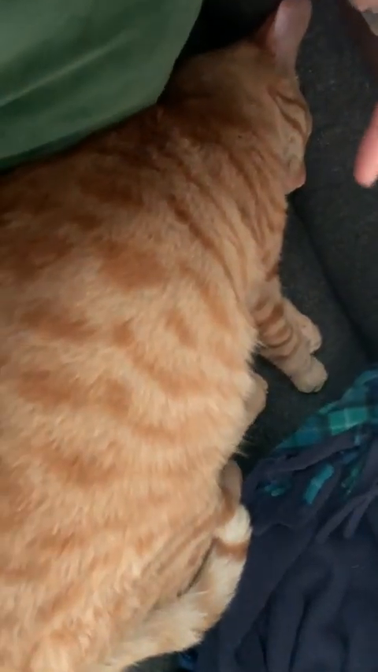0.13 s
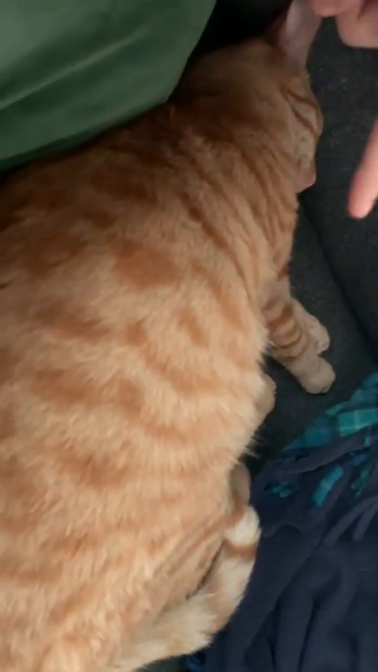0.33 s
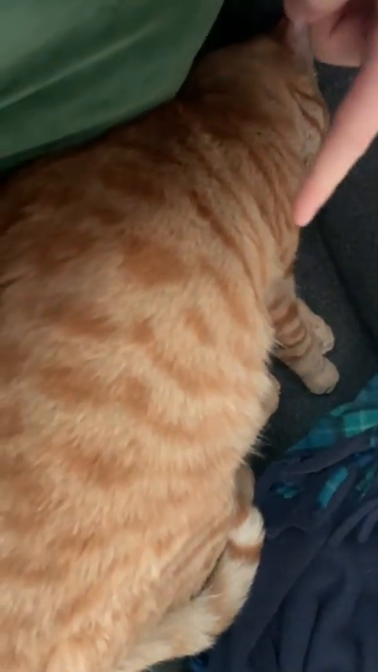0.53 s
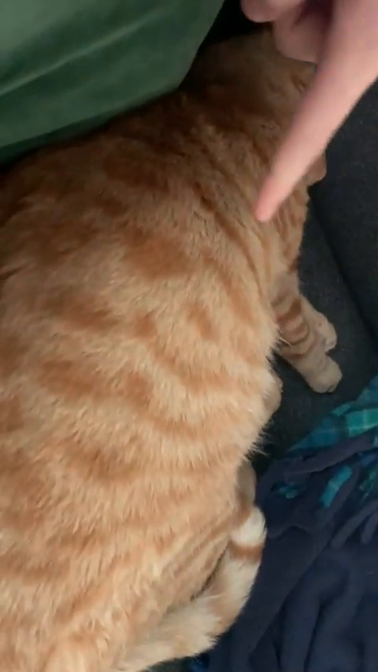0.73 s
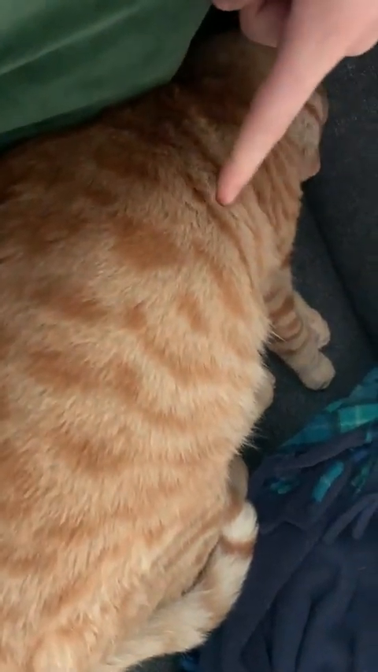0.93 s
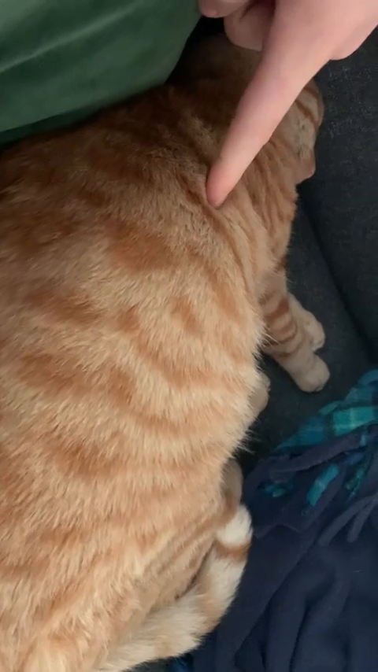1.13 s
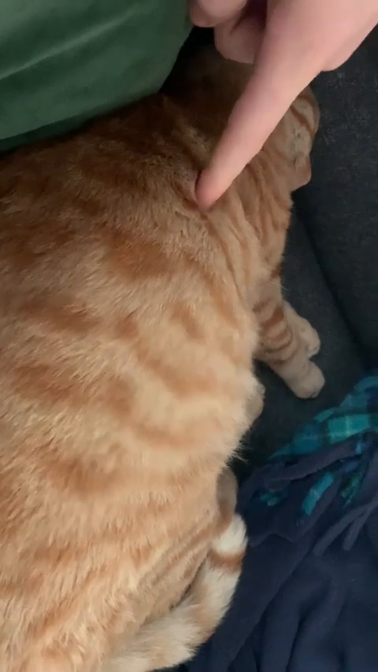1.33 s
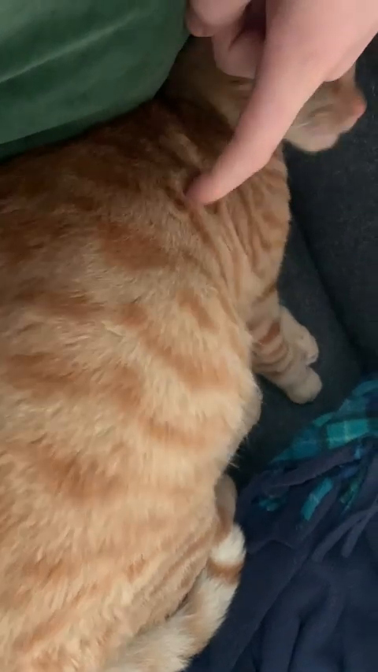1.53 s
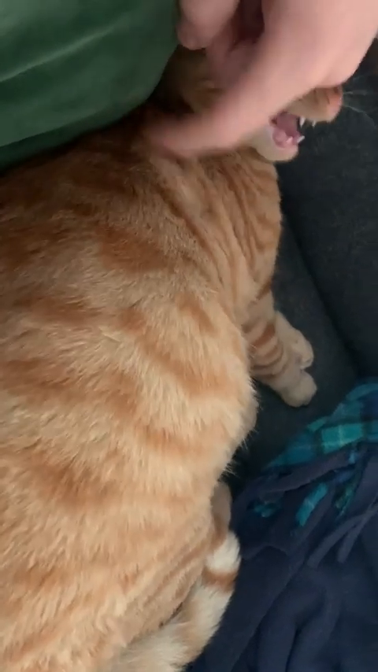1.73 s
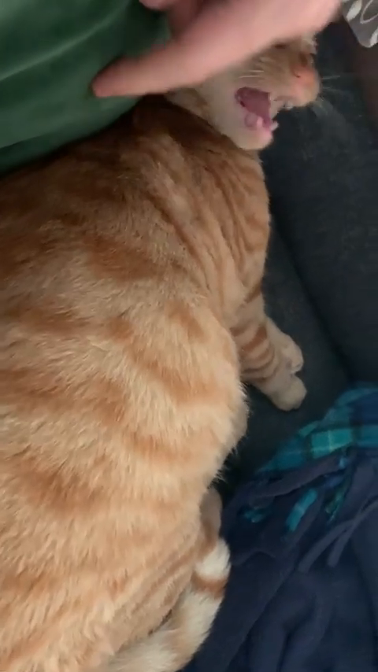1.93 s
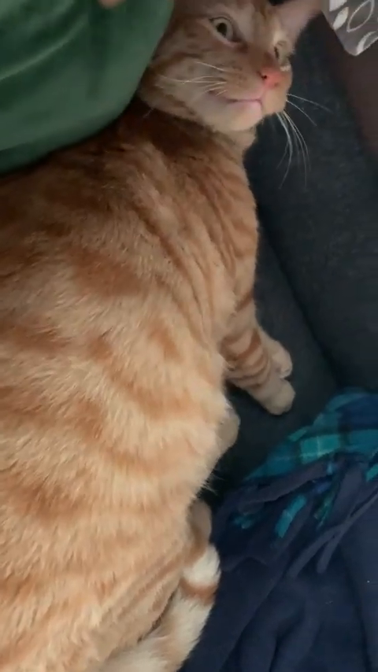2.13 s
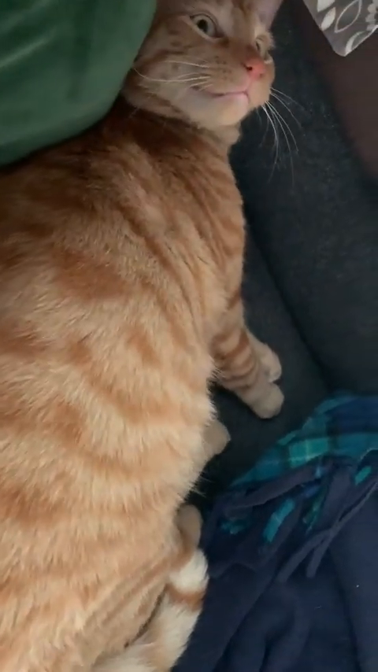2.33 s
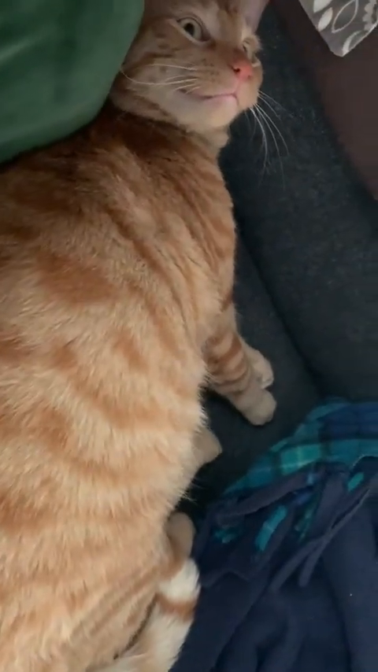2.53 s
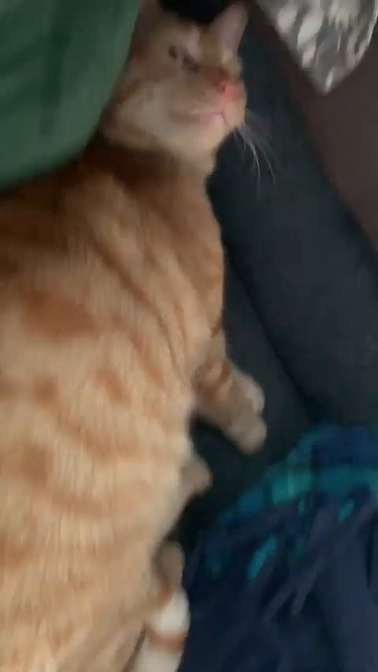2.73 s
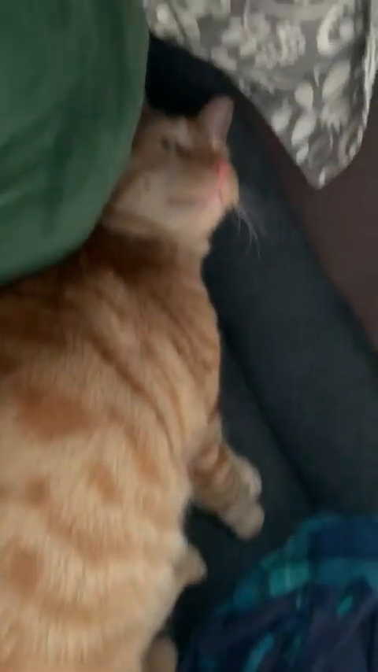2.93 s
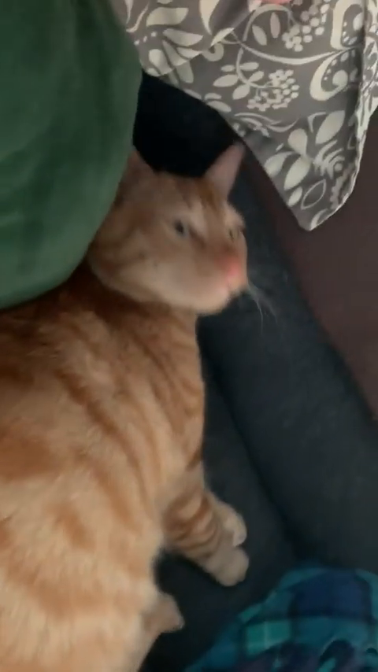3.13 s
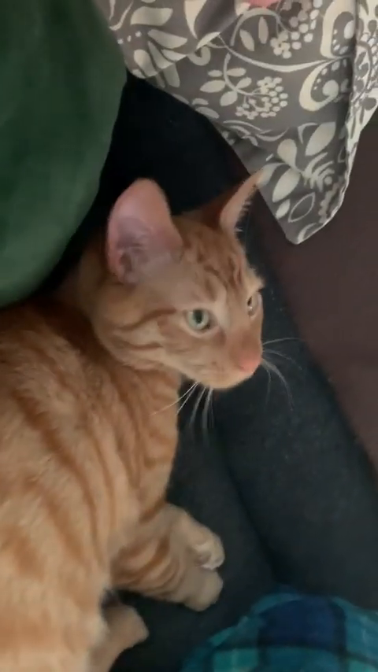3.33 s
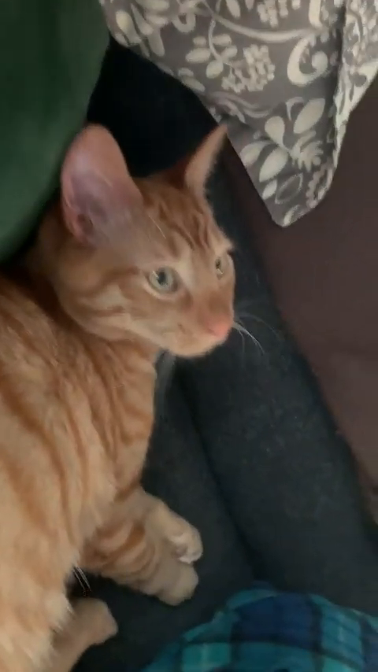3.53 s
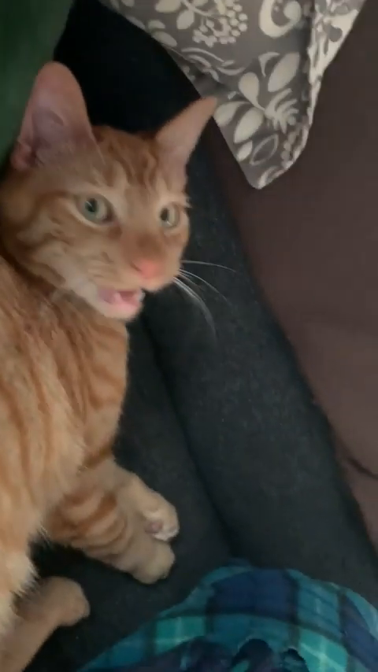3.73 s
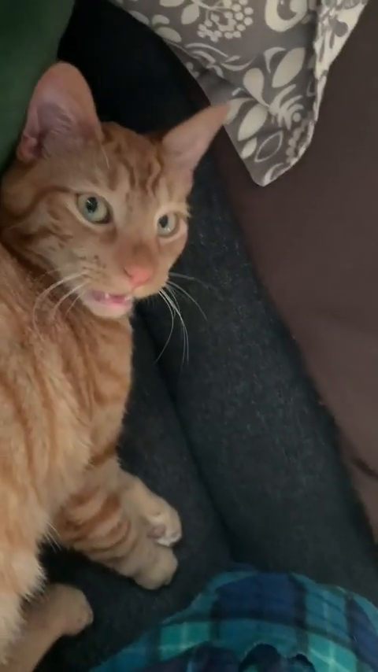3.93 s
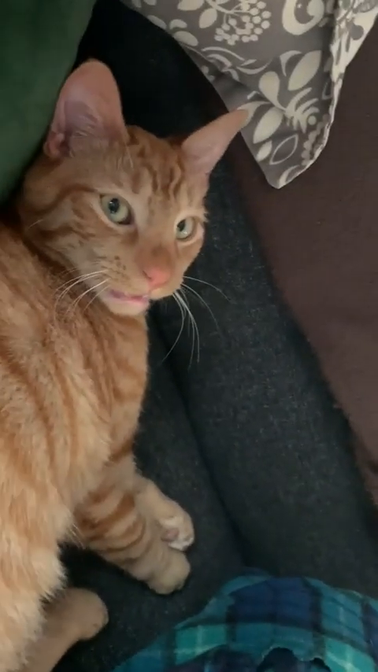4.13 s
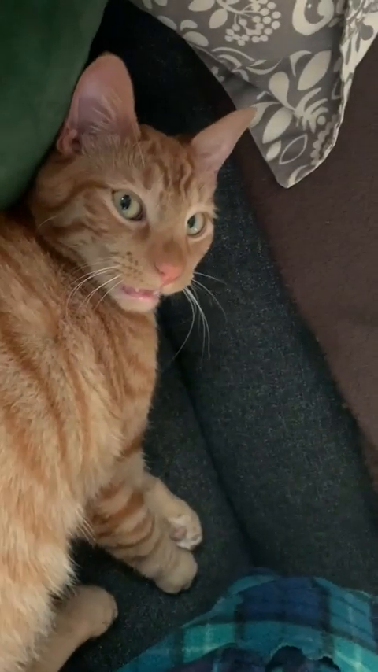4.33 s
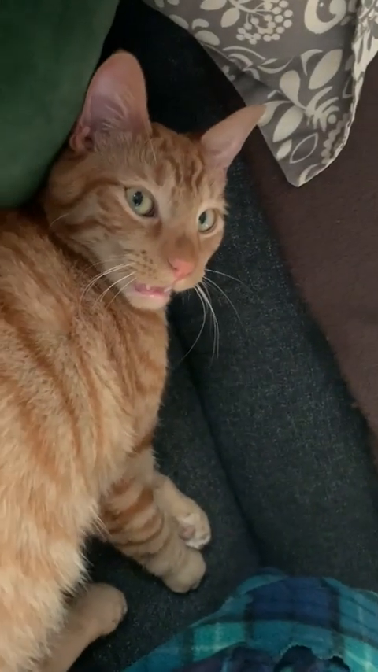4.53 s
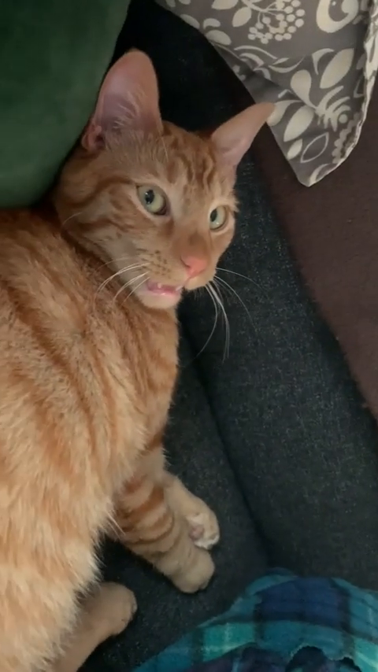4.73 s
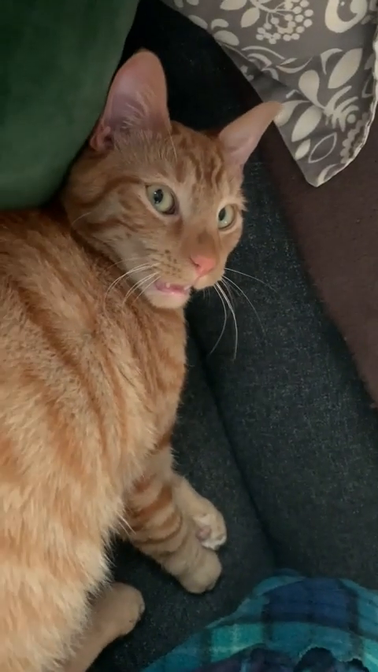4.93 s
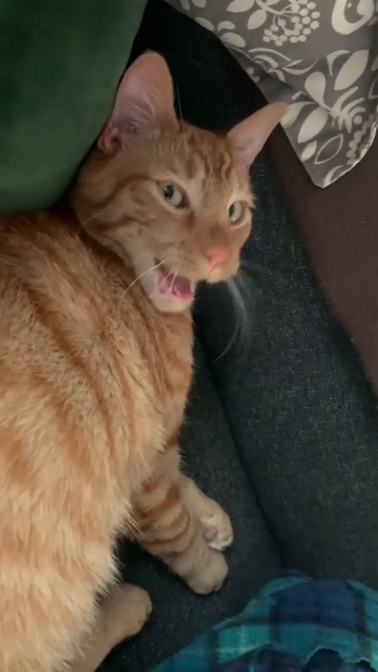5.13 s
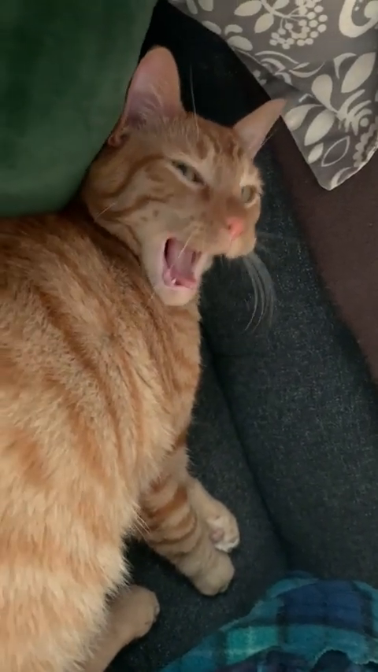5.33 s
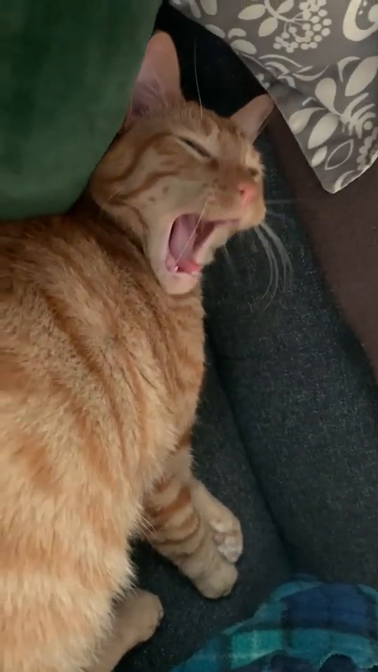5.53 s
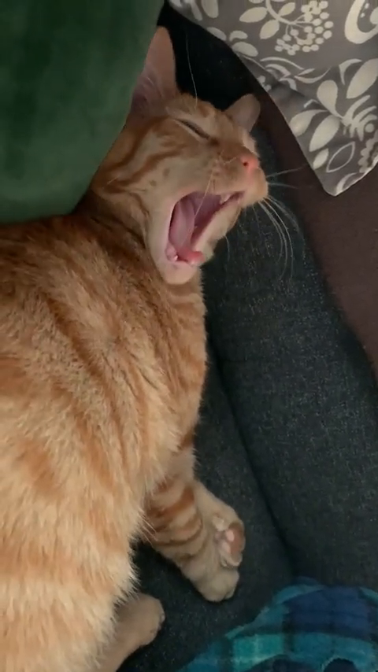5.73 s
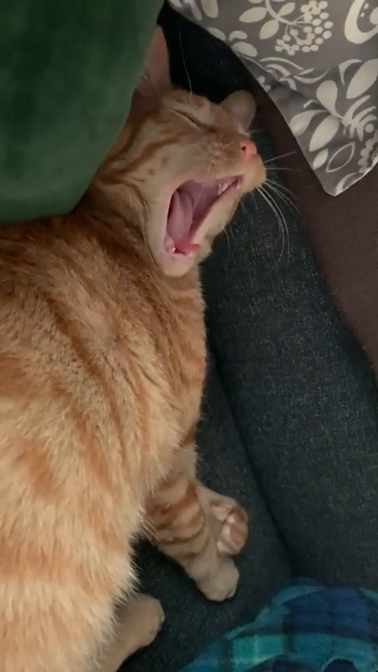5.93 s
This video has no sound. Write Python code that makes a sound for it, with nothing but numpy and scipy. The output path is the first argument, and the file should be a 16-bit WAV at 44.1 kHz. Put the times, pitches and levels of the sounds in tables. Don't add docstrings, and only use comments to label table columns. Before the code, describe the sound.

Quiet low room rumble with a distant fan drone and thin whine. After a second of faint rubbing, a cat very near the microphone purrs out a rolling trill, rasps and squeaks, voice cracking. Cushions are pushed with muffled thumps, cloth rustles. Then a barely audible broken chirp, wet mouth clicks, a bright smooth mew, a pause, and a high whistly yawn squeak.

```python
import sys
import numpy as np
from scipy import signal
from scipy.fft import rfft, irfft, next_fast_len
from scipy.io import wavfile
from scipy.ndimage import uniform_filter1d, map_coordinates

SR = 44100
rng = np.random.default_rng(int(sys.argv[2]) if len(sys.argv) > 2 else 0)


def ratio_of_db(decibels):
    return 10 ** (np.asarray(decibels, float) / 20)


def digitize_waveform(pressure):
    field = np.atleast_2d(pressure).T
    bounded = np.clip(field, -1, 1)
    quanta = np.round(bounded * 32767).astype(np.int16)
    wavfile.write(sys.argv[1], SR, quanta)


N = 268657

# time [s], peak [dB], ring [Hz], low part [dB], low ring [Hz].
CLICK_EVENTS = [(0.1, -58, 6700, -18, 3080), (1.3603, -57, 6860, -20, 2510), (2.401, -53.5, 6950, -8, 2750),
                (2.708, -64, 6900, -10, 3070), (3.038, -56, 7200, -18, 2680), (3.5686, -63, 7000, -1, 3900),
                (3.573, -33.5, 7580, -28, 3830), (3.635, -41.5, 8150, -16, 3430),
                (4.0958, -62, 7500, -3, 3530), (4.4933, -45, 7900, -23, 3180),
                (4.5344, -71, 7290, -1, 3500), (5.0897, -47, 10150, -2.5, 3090)]
# frequency [Hz], level [dB].
NEAR_SIDE = [(200, -12), (560, -3.5), (1100, -13), (1800, -6), (2500, -1.5), (3700, -0.5), (6500, -3),
             (9000, -6), (14000, -7)]


def unit(x):
    return x / np.sqrt(np.mean(x ** 2) + 1e-20)


def along(points, hz):
    f, v = np.transpose(points)
    return np.interp(np.log(hz + 1), np.log(f + 1), v)


def curves(rows):
    s, *cols = np.transpose(rows)
    return [np.interp(np.arange(N) / SR, s, c) for c in cols]


def gate(rows, fade_s):
    t = np.arange(N) / SR
    return np.clip(np.minimum(t - rows[0][0], rows[-1][0] - t) / fade_s, 0, 1)


def wobble(rate):
    knots = rng.standard_normal(int(N * rate / SR) + 4)
    return map_coordinates(knots, [np.arange(N) * rate / SR])


def filtered(x, response):
    m = next_fast_len(N + SR // 2)
    return irfft(rfft(x, m) * response(np.fft.rfftfreq(m, 1 / SR)), m)[..., :N]


def noise(spectrum):
    return unit(filtered(rng.standard_normal(N), lambda hz: ratio_of_db(along(spectrum, hz))))


def played(rows, *layers):
    t, gains = np.arange(N) / SR, np.zeros((len(layers), N))
    for s, rise, fall, *db in rows:
        live = slice(max(round((s - 2 * rise) * SR), 0), round((s + 2 * fall) * SR))
        off = (t[live] - s) / np.where(t[live] < s, rise, fall)
        gains[:, live] += ratio_of_db(np.array(db)[:, None] - 20 * off ** 2)
    return np.sum(gains * layers, axis=0)


def beside(mid, gain):
    # frequency [Hz], lead [radians].
    side_lead = [(60, 4), (400, 3.5), (700, 3), (1100, 2), (1800, 2), (2500, 1.5), (3700, 2), (6500, -1.45)]
    return filtered(mid, lambda hz: gain(hz) * np.exp(1j * along(side_lead, hz)))


def voice(rows, timbre, mouth, flutter=0, slack_per_db=0, jaw_db=0, glide_s=0):
    flutter_hz, crest_s, flutter_end_s, depth, depth_db = 37.2, 1.5025, 1.622, .084, 2.0
    lean_rad, stumble_rad = .6, .25
    flag_per_db, flare_db, jaw_s = .022, 4, 0.043
    t = np.arange(N) / SR
    pitch, first, opening = curves(rows)
    pitch = uniform_filter1d(pitch, size=round(glide_s * SR) + 1)
    second_db, third_db, upper_db, rough, patchy_db = timbre
    second = first + second_db + opening + 0.41 * patchy_db * wobble(45)
    third = first + third_db + opening
    sag_db = first.max() - first
    rough = rough + slack_per_db * sag_db
    upper_db = upper_db + jaw_db * np.exp(-np.abs(t - rows[0][0]) / jaw_s)

    beat = 2 * np.pi * flutter_hz * (t - crest_s) + stumble_rad * wobble(24.86)
    flutter = flutter * np.clip((flutter_end_s - t) / 0.01, 0, 1)
    flutter = flutter * np.clip(1.5 - flag_per_db * sag_db, 0, 1)
    swing = flutter * (np.cos(beat) + .25 * np.sin(2 * beat))
    shake = 0.0614 * rough * wobble(120) + 0.00284 * wobble(30) + 0.0042 * wobble(250)
    pitch = pitch * (1 + depth * swing + shake)
    phase = 2 * np.pi * np.cumsum(pitch) / SR

    out = -ratio_of_db(first) * np.cos(phase) - ratio_of_db(second) * np.cos(2 * phase)
    out = out + ratio_of_db(third + patchy_db * wobble(60)) * np.sin(3 * phase - 1.5)
    live = slice(round(rows[0][0] * SR), round(rows[-1][0] * SR))
    for k in range(4, 12):
        level = third + upper_db + along(mouth, k * pitch)
        level = level + flare_db * flutter * np.cos(beat) * (k > 5)
        level = level + patchy_db * (wobble(150) + wobble(25))
        out[live] += ratio_of_db(level[live]) * np.sin(k * phase[live])
    loud_db = depth_db * flutter * np.cos(beat + lean_rad) + 9 * rough * wobble(150) + 0.38 * wobble(40)
    return np.sqrt(2) * gate(rows, fade_s=0.0029) * ratio_of_db(loud_db) * out


def calls():
    # time [s], pitch [Hz], level [dB], mouth opening [dB].
    trill = [(1.312, 773, -61, -6), (1.358, 668, -57, -7.5), (1.408, 621.5, -50.5, -5.5),
             (1.47, 559.4, -45.5, -2.5), (1.522, 560, -43.5, -0.5), (1.55, 558.4, -44, 0.5),
             (1.575, 563.5, -43.5, 0), (1.598, 576, -47, 5), (1.61, 596, -47, 4.5), (1.62, 710, -68, 9)]
    afterbeat = [(1.611, 636, -59, 4), (1.62, 629, -58.5, 5), (1.632, 622, -53, 5.1),
                 (1.642, 670, -57, 5.5), (1.65, 700, -62, 5), (1.66, 660, -74, 3)]
    squeak_parts = [
        [(1.715, 976, -67, -4), (1.727, 987, -48.5, -8), (1.736, 1000, -50, -4), (1.755, 1002, -50, -2),
         (1.776, 974, -54, -5)],
        [(1.801, 950, -50, 5), (1.811, 1016, -54, 1.5), (1.817, 992, -54, 5), (1.824, 960, -53, 0),
         (1.833, 1034, -52, 1), (1.847, 1046, -48, 5), (1.862, 935, -56, 8)],
    ]
    voice_break = [(1.7765, 892, -51, -1), (1.788, 908, -50, 0), (1.801, 934, -50, 0)]
    cry = [(1.858, 919, -50, 8), (1.87, 951, -53.5, 13), (1.892, 1013, -47.5, -3), (1.915, 980, -47, -1),
           (1.934, 953, -49, 2), (1.968, 968, -49.5, -3), (1.981, 1010, -41.5, -15),
           (1.991, 1050, -43.5, -20), (2.008, 1025, -64, -8)]
    chirp = [(3.089, 900, -66, -8), (3.099, 956, -53.5, -13), (3.109, 934, -50, -7), (3.114, 870, -53, 6),
             (3.122, 904, -75, 0), (3.134, 953, -51, -5), (3.139, 900, -62, 6), (3.143, 1050, -65, -5),
             (3.15, 930, -66, -5), (3.165, 913, -60, -6), (3.18, 920, -68, -6)]
    mew = [(3.6395, 1049, -43, -1), (3.652, 1035, -40.5, 6.5), (3.658, 1040, -41, 3),
           (3.662, 1076, -47, -10), (3.671, 1084, -46, -10), (3.677, 1082, -42.5, -3),
           (3.688, 1097, -41, 2), (3.708, 1160, -39.5, 2), (3.75, 1189, -40, -1), (3.798, 1207, -41.5, -1),
           (3.81, 1235, -41.5, -8), (3.832, 1270, -44, -2), (3.862, 1268, -42.5, -1),
           (3.89, 1235, -40.5, -4), (3.955, 1147, -41, -12), (3.974, 1127, -44, -17),
           (3.985, 1048, -45, -18), (3.994, 1020, -44.5, -18), (4.006, 1016, -57, -14)]
    yawn = [(5.06, 1023, -77, 1), (5.09, 1110, -54, -5), (5.098, 1098, -42, -10), (5.122, 1184, -42.5, 2),
            (5.15, 1200, -44.5, -11), (5.195, 1201, -47.5, -14), (5.25, 1283, -49, -5),
            (5.346, 1439, -56.5, 6), (5.405, 1478, -64.5, 11.5), (5.45, 1464, -58.5, 9),
            (5.524, 1385, -49.5, 2), (5.624, 1208, -44, -16), (5.704, 1149, -48.5, -8),
            (5.735, 1140, -61, -5)]
    # frequency [Hz], level [dB].
    open_mouth = [(3500, 14.5), (4300, 18.5), (4900, -11), (5900, 12.5), (7300, 14.5), (7700, 5), (8300, 4),
                  (8800, -10), (9500, 4), (10000, -16), (10700, -10), (11500, -34)]
    shut_lips = [(2300, -4), (2800, -16.5), (3300, -39), (4100, -11), (4600, -24.5), (5300, -42),
                 (7000, -21), (9000, -48)]
    # 2nd over 1st dB, 3rd over 1st dB, higher harmonics dB, roughness 0-1, patchiness dB
    purred, flicked = (7.5, -4, -4, 0.02, 0.8), (5, -2, 6, 0.12, 2)
    hoarse, broken = (-11, -29, -13, .1, 4), (0, -1, -26, .09, 1.5)
    strained, cracked = (-10, -23, -17, .08, 1.8), (-16, -24, -29, 0.47, 4)
    clear, thin = (-22, -33, -13, .075, 4), (-23, -35, -24, .045, 4)
    glide_s = .025

    out = voice(trill, purred, shut_lips, flutter=0.86, slack_per_db=.003)
    out = out + voice(afterbeat, flicked, shut_lips)
    for part in squeak_parts:
        out = out + voice(part, hoarse, open_mouth)
    out = out + voice(voice_break, broken, open_mouth)
    out = out + voice(cry, strained, open_mouth)
    out = out + voice(chirp, cracked, open_mouth)
    out = out + voice(mew, clear, open_mouth, jaw_db=-16, glide_s=glide_s / 2)
    return out + voice(yawn, thin, open_mouth, glide_s=glide_s)


def rasp():
    # peak [s], rise [s], fall [s], rattle [dB], hiss [dB].
    puffs = [(1.36, 0.022, 0.071, -62, -70), (1.5, 0.099, 0.16, -69, -70), (1.62, 0.064, 0.041, -55, -74),
             (1.648, .006, 0.02, -53, -80), (1.695, 0.038, 0.0092, -58.5, -68.5),
             (1.72, .005, 0.06, -63, -67), (1.772, 0.029, 0.01, -59, -58),
             (1.818, 0.015, 0.054, -51, -56.5), (1.865, 0.032, 0.047, -70, -57),
             (1.895, 0.023, 0.042, -57.5, -56.5), (1.98, 0.058, 0.027, -76, -61.5),
             (3.164, .05, .04, -83, -76.5), (3.579, 0.0046, 0.0057, -63, -61.5),
             (3.62, .03, 0.028, -82, -78), (3.648, 0.012, 0.028, -64.5, -67),
             (4.05, 0.098, .02, -80, -77.5)]
    # peak [s], rise [s], fall [s], level [dB].
    creaks = [
        (1.65, .006, 0.072, -49.5),
        (3.12, .04, 0.062, -70),
        (3.555, .006, 0.035, -56.5),
        (3.591, 0.0045, 0.01, -48),
        (3.601, 0.0069, 0.019, -49),
        (3.145, 0.0087, 0.022, -60),
    ]
    # centre [Hz], width [Hz], level [dB].
    throat_modes = [(1060, 190, 8), (1770, 360, 4), (2510, 200, 9.5), (4130, 880, -8)]
    # frequency [Hz], density [dB per Hz].
    hiss_spectrum = [(4500, -45), (5300, -44), (6300, 3.5), (7200, 14.5), (7600, 6), (7950, -7), (8500, 6),
                     (9300, -10), (10500, -30), (12000, -34)]

    def throat(f):
        modes = enumerate(throat_modes)
        return sum((-1) ** k * ratio_of_db(db) * 1j * f * w / (c * c - f * f + 1j * f * w) for k, (c, w, db) in modes)

    def creak_mode(f):
        return (1j * f * 700 / (1050 ** 2 - f * f + 1j * f * 700)) ** 2

    slaps = (rng.random(N) < 420 / SR) * ratio_of_db(3 * rng.standard_normal(N))
    slaps = unit(slaps) + 1.3 * rng.standard_normal(N)
    rattle = ratio_of_db(0.5) * unit(filtered(slaps, lambda f: throat(f) / (1 + (f / 4300) ** 8)))
    hiss = ratio_of_db(-1.0) * unit(ratio_of_db(1.0 * wobble(200)) * noise(hiss_spectrum))
    creak = unit(filtered(slaps, creak_mode))
    return played(puffs, rattle, hiss) + played(creaks, creak)


def fry():
    # time [s], peak [dB].
    lone_slaps = [(1.6563, -40), (1.681, -38), (1.6848, -42), (1.6886, -35), (1.6929, -36), (1.6991, -35),
                  (1.7195, -42), (1.724, -38), (1.7283, -38), (1.7582, -38), (1.7715, -37), (1.7765, -38),
                  (1.8005, -39), (1.8025, -38), (1.8046, -32), (1.8085, -34), (1.8145, -38), (1.818, -37),
                  (1.8267, -35), (1.8328, -37), (1.8355, -37), (1.841, -37)]
    # start [s], end [s], rate [per s], peak [dB].
    slap_runs = [
        (1.662, 1.678, 280, -47.5),
        (1.733, 1.754, 320, -43.5),
        (1.761, 1.77, 300, -42),
        (1.8205, 1.828, 380, -39),
        (1.842, 1.859, 380, -42),
    ]
    slap_hz, width_hz, jitter, scatter_db = 1770, 1070, .14, 2
    blows = np.zeros(N)
    for start, end, rate, db in slap_runs:
        chance = rng.standard_normal((2, 30))
        s = start + (np.arange(30) + jitter * chance[0]) / rate
        inside = s < end
        blows[np.round(s[inside] * SR).astype(int)] = ratio_of_db(db + scatter_db * chance[1][inside])
    for s, db in lone_slaps:
        blows[round(s * SR)] = ratio_of_db(db)
    peak = 2 * np.sqrt(np.pi) * width_hz / SR
    return -filtered(blows, lambda f: np.exp(-((f - slap_hz) / width_hz) ** 2 - .6j) / peak)


def clicks():
    out, t = np.zeros(N + SR), np.arange(SR // 50) / SR
    for s, db, hz, low_db, low_hz in CLICK_EVENTS:
        ring = np.sin(2 * np.pi * hz * t) * ratio_of_db(-60 * t / 0.0028)
        ring = ring + 0.38 * rng.standard_normal(len(t)) * ratio_of_db(-60 * t / 0.0013)
        ring = ring + ratio_of_db(low_db) * np.sin(2 * np.pi * low_hz * t) * ratio_of_db(-60 * t / 0.0074)
        out[round(s * SR):][:len(t)] += ratio_of_db(db + 9.5) * ring * (1 - np.exp(-t / 0.00021))
    return filtered(out[:N], lambda f: 1 / (1 + (f / 14500) ** 6))


def thuds():
    # time [s], peak [dB], frequency [Hz].
    pushes = [
        (2.097, -52, 160),
        (2.265, -53, 166),
        (2.309, -27.5, 183),
        (2.38, -26, 162),
        (2.432, -32, 209),
    ]
    out, t = np.zeros(N + SR), np.arange(SR // 10) / SR
    for s, db, hz in pushes:
        push = np.sin(2 * np.pi * hz * t) * (1 - np.exp(-t / 0.0014))
        out[round(s * SR):][:len(t)] += ratio_of_db(db + 2.5 - 60 * t / 0.018) * push
    return out[:N]


def rustle():
    # peak [s], rise [s], fall [s], bright fur [dB], cloth body [dB].
    strokes = [(.3, 0.94, 0.57, -82.5, -77.5), (.75, 0.7, 0.65, -84.5, -75), (.97, 0.052, 0.05, -89, -83),
               (1.29, 0.066, .05, -81, -91), (1.36, 0.058, 0.28, -79.5, -69), (1.81, 0.079, 0.11, -91, -57),
               (2.1, 0.49, 0.21, -62, -61.5), (2.4, 0.35, 0.091, -72.5, -64),
               (2.708, 0.12, 0.077, -81, -65), (3.06, 0.022, 0.084, -84, -99), (3.17, .08, .05, -84, -72),
               (3.45, 0.24, 0.54, -84, -68.5), (5.52, 0.41, 0.49, -83, -86), (6.05, 0.072, 0.092, -94, -74)]
    # frequency [Hz], density [dB per Hz].
    fur_spectrum = [(3060, -49), (5200, -27), (5620, -14.5), (7230, -4), (7950, -6), (8600, -10.5),
                    (9160, -12.5), (12700, -13), (13800, -15), (15500, -18.5)]
    cloth_spectrum = [(400, -51), (700, 13), (1500, 1.5), (2000, 2.5), (2600, -5.5), (3450, -2),
                      (5100, -4.5), (7000, -11.5), (8000, -23), (10400, -24), (15000, -55)]

    def side_gain(hz):
        band = 1 / (1 + (hz / 7000) ** 24) + np.exp(-((hz - 7550) / 130) ** 2)
        return ratio_of_db(along(NEAR_SIDE, hz) + 3.0) * band

    bright_grain_db = 1.5 * wobble(300) + 1.2 * wobble(18) + 1.0 * wobble(60)
    bright = ratio_of_db(1.0) * unit(ratio_of_db(bright_grain_db) * noise(fur_spectrum))
    body = ratio_of_db(1.5) * unit(ratio_of_db(2.5 * wobble(200) + 1.2 * wobble(20)) * noise(cloth_spectrum))
    mid = played(strokes, bright, body)
    return mid, beside(mid, side_gain)


def walls(x):
    t60_s, tail_db, treble_hz = .15, -19, 3500
    t = np.arange(SR // 3) / SR
    tail = rng.standard_normal((2, len(t))) * ratio_of_db(-60 * t / t60_s)
    tail = tail / np.linalg.norm(tail[0])
    x = filtered(x, lambda hz: 1 / (1 + 1j * hz / treble_hz) ** 2)
    late = np.pad(x, (300, 0))[None]
    return ratio_of_db(tail_db) * signal.fftconvolve(late, tail, axes=1)[:, :N]


def motor():
    # peak [s], rise [s], fall [s], level [dB].
    surges = [
        (0.01, .1, 0.09, -49),
        (.45, 0.25, 0.44, -50.5),
        (1.66, 0.18, 0.16, -44.5),
        (2.12, 0.076, .15, -48),
        (2.37, 0.051, 0.16, -47),
        (4.02, 0.1, 0.14, -41.5),
        (4.44, 0.061, 0.07, -35.5),
        (4.9, 1, 0.16, -53.5),
    ]
    drone_hz, drone_db, whine_hz, whine_db = 215, -50.5, 683, -68
    turn_s, turn_len_s, turn_db = 2.79, 0.13, 3.5
    drone = filtered(rng.standard_normal(N), lambda f: 1 / (1 + ((f - drone_hz) / 12) ** 2))
    drone = ratio_of_db(-7.5) * unit(drone)
    drone = ratio_of_db(drone_db) * drone + played(surges, drone)
    whine_phase = 2 * np.pi * np.cumsum(whine_hz + 1.16 * wobble(6)) / SR
    whine = np.sqrt(2) * ratio_of_db(1.8 * wobble(12)) * np.sin(whine_phase)
    turned = np.clip((np.arange(N) / SR - turn_s) / turn_len_s, 0, 1)
    mid_whine_db = whine_db + turn_db * turned + 0.34 * wobble(3.87) + 2.0
    side = beside(ratio_of_db(-17.5) * drone + ratio_of_db(-57) * whine, lambda f: 1)
    return drone + ratio_of_db(mid_whine_db) * whine, side


def diffuse(mid_gain, side_gain):
    # frequency [Hz], share of side tied to mid.
    tied_share = [(60, 1), (400, 0.77), (600, 0.64), (1100, 0.39), (1800, 0.43), (2500, 0.2), (3700, 0.51),
                  (6500, 0.18)]

    def tie(hz):
        return np.clip(along(tied_share, hz), 0, .99)

    a, b = rng.standard_normal((2, N))
    side = beside(a, lambda hz: side_gain(hz) * tie(hz))
    side = side + filtered(b, lambda hz: side_gain(hz) * np.sqrt(1 - tie(hz) ** 2))
    return filtered(a, mid_gain), side


def room():
    # frequency [Hz], density [dB per Hz].
    mid_spectrum = [(15, -57), (25, -41.5), (49, -5), (70, -3.5), (145, -3.5), (212, -4), (246, -11),
                    (393, -10), (423, -14.5), (456, -14.5), (639, -22), (689, -22), (1040, -28.5),
                    (1480, -24), (2200, -38.5), (2860, -60), (4840, -120)]
    side_spectrum = [(15, -73), (25, -47), (49, -22), (203, -10), (241, -18), (385, -8.5), (435, -23),
                     (469, -7), (630, -22), (678, 0), (730, -19), (1220, -15.5), (1350, -25), (3120, -32.5),
                     (6450, -50), (6850, -58), (7100, -80), (7380, -76), (7550, -54), (7750, -75),
                     (11700, -83), (19800, -120)]
    far_hiss = [(1180, -23), (2000, -16), (2750, -6), (3130, -6.5), (3590, -4.5), (4810, -12.5),
                (5560, -19), (6550, -15), (7260, -19), (7840, -17.5), (8700, -18), (10900, -19),
                (14400, -21.5), (15600, -24)]
    # time [s], mid [dB], side [dB].
    room_level = [(0.0, -0.5, 0), (6.09, -0.5, 0)]
    # centre [Hz], width [Hz], level [dB], side against mid [dB].
    fan_bands = [(62, 6.1, -56.5, -24), (455, 23, -62, -8.5), (1510, 26, -72, -2)]
    mid_db, side_db = curves(room_level)
    mid, side = diffuse(lambda hz: ratio_of_db(along(mid_spectrum, hz)) + ratio_of_db(along(far_hiss, hz) - 36),
                        lambda hz: ratio_of_db(along(side_spectrum, hz)))
    mid = ratio_of_db(-47 + mid_db + .6 * wobble(3.067)) * unit(mid)
    side = ratio_of_db(-53 + side_db + .7 * wobble(2.66)) * unit(side)
    for hz, width, db, across_db in fan_bands:
        band = filtered(rng.standard_normal(N), lambda f: 1 / (1 + (2 * (f - hz) / width) ** 2))
        band = ratio_of_db(db) * unit(band)
        mid, side = mid + band, side + beside(band, lambda f: ratio_of_db(across_db))
    return mid, side


def flickering(x):
    flicker_hz, crest_s, len_s, gain = 46.875, .0125, .002, 4.5
    off = ((np.arange(N) / SR - crest_s) * flicker_hz + .5) % 1 - .5
    flare = unit(1 + gain * np.exp(-(off / (len_s * flicker_hz)) ** 2))
    return x + (flare - 1) * filtered(x, lambda hz: (hz > 11700) & (hz < 12950))


def starved(x):
    # low [Hz], high [Hz], start [s], end [s], share of the time.
    weak_bands = [(5050, 5400, 0, 1.3, .12), (5100, 5500, 1.3, 2.45, .8), (4800, 5150, 1.3, 2.45, .3),
                  (5300, 5650, 2.45, 4, .75), (5600, 5950, 2.7, 4, .3), (5100, 5500, 4, 6.1, .62),
                  (5450, 5750, 4, 6.1, .3), (4800, 5100, 2.45, 6.1, .15), (7650, 8250, 0, 2.5, .55),
                  (7650, 8250, 2.5, 4.3, .25), (7650, 8250, 4.3, 6.1, .04), (8250, 8950, 1.9, 4, .08),
                  (9100, 9750, 0, 6.1, .04), (9100, 9750, 1.5, 2.35, .4), (11400, 11950, 0, 6.1, .65),
                  (12800, 13300, 0, 6.1, .7), (10800, 11200, 0, 6.1, .15), (13500, 13900, 0, 6.1, .2),
                  (14100, 14500, 0, 6.1, .15), (15050, 15750, 0, 6.1, .45)]
    runs_per_s, edge_s, spare_s = 26, .008, .02
    t = np.arange(N) / SR
    calm = np.all([np.abs(t - row[0]) > spare_s for row in CLICK_EVENTS], axis=0)
    for low, high, start, end, share in weak_bands:
        need = wobble(runs_per_s)
        shut = (need < np.quantile(need, share)) & (t >= start) & (t < end) & calm
        shut = uniform_filter1d(shut * 1., size=round(edge_s * SR))
        x = x - shut * filtered(x, lambda hz: (hz > low) & (hz < high))
    return x


def scene():
    near = calls() + rasp() + fry() + clicks() + thuds()
    mid, side = np.sum([rustle(), motor(), room()], axis=0)
    mid = mid + near
    side = side + beside(near, lambda hz: ratio_of_db(along(NEAR_SIDE, hz)))
    return np.array([mid + side, mid - side]) + walls(near)


def top_cut(x):
    return signal.sosfilt(signal.butter(12, 16290, fs=SR, output="sos"), x)


def record(dry):
    # centre [Hz], width [Hz], level [dB].
    port_dips = [(5040, 310, -2.5), (7900, 380, -3), (11900, 200, -6), (13020, 200, -4.5)]

    def housing(hz):
        return ratio_of_db(sum(db * np.exp(-((hz - c) / w) ** 2) for c, w, db in port_dips))

    mid, side = (dry[0] + dry[1]) / 2, (dry[0] - dry[1]) / 2
    mid = starved(filtered(flickering(mid), housing))
    heard = filtered(np.array([mid + side, mid - side]), lambda hz: hz < 15720)
    return top_cut(heard)


dry = scene()
out = record(dry)
digitize_waveform(out)
```